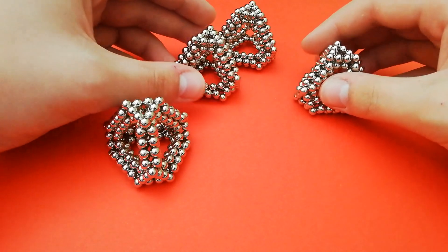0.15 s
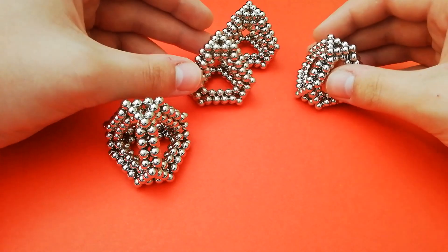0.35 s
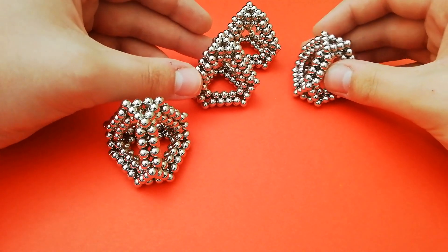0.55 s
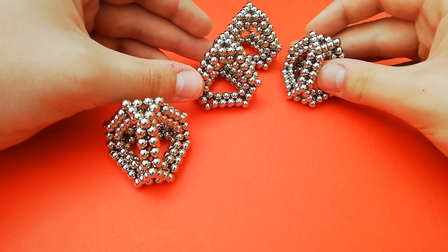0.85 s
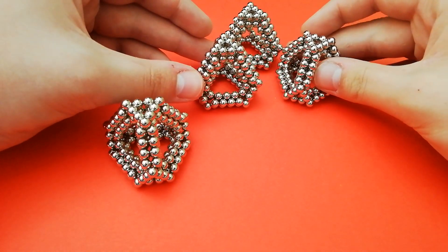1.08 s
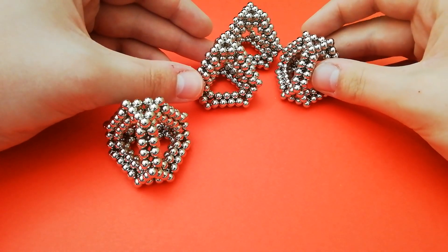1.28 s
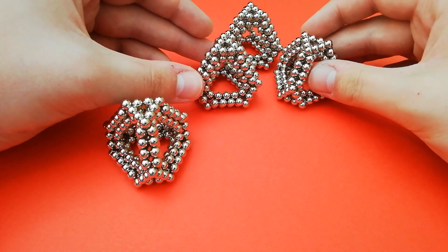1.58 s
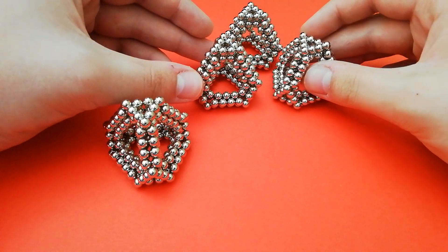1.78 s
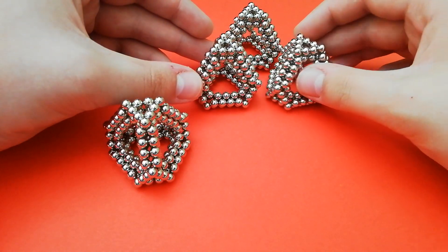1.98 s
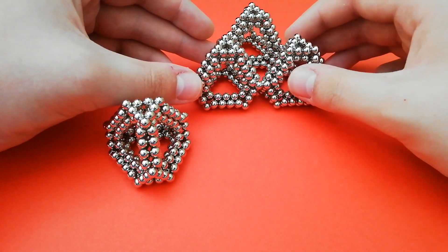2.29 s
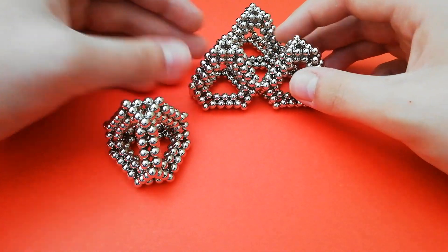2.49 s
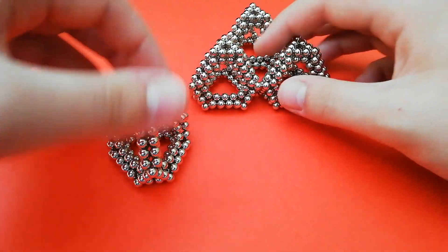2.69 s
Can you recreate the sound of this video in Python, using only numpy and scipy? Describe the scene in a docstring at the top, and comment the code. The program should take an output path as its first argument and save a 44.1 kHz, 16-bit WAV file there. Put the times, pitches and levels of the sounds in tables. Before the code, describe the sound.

Small steel magnet balls snap together on a wooden table, heard very close in a small quiet room. Soft dragging, skin rubbing and a faint squeak open it, with a flurry of tiny ticks at 0.2-0.35 s and a crisp click at 0.45. A click with a light knock comes at 1.07, the loudest rapid double snap at 2.2, then hissy rubbing from 2.45 and a soft thump at 2.83.

```python
"""Skin rubs and clusters of small steel magnet balls slide over a wooden table, hands snap the clusters together
now and then, and rubbing returns near the end, with a soft thump on the table last of all. Rubbing is noise made of
tiny grains, with a wavering scrape and a thin squeak; sliding and thump are soft noise ringing the table. Each snap
is a quick cascade of ball-on-ball ticks, and short pushes knock the table top along with the strong ones.
A spaced pair of microphones listens from close by; a small quiet room adds a short tail and a steady tone."""
import sys
import numpy as np
from scipy import signal
from scipy.fft import rfft, irfft
from scipy.io import wavfile
from scipy.ndimage import uniform_filter1d

SR = 44100
rng = np.random.default_rng(int(sys.argv[2]) if len(sys.argv) > 2 else 0)


def natural_amplitude(level_db):
    """Convert a level in decibels to a linear amplitude factor, elementwise."""
    exponent = np.asarray(level_db, float) / 20
    return 10 ** exponent


def materialize(psi):
    """Save the field psi as 16-bit PCM at rate SR to the path in sys.argv[1].

    A 1-D psi becomes a single channel; in a 2-D psi each row is a channel.
    """
    bounded = np.clip(np.atleast_2d(psi).T, -1, 1)
    quanta = np.round(bounded * 32767).astype(np.int16)
    wavfile.write(sys.argv[1], SR, quanta)


N = 125685

# steady tone of the room: (frequency [Hz], level [dB])
ROOM_TONE = [(12, -37), (22, -3), (65, -2), (176, -14.5), (308, -15.5), (455, -22.5), (653, -24),
             (993, -20), (1310, -18.5), (1600, -20), (2630, -23), (4120, -22.5), (8500, -27.5),
             (12000, -28), (15800, -34.5), (15950, -87)]
# how alike the room tone is left and right: (frequency [Hz], likeness [-1 to 1])
ROOM_ALIKE = [(60, 1), (130, 0.77), (290, 0.062), (640, -0.81), (1410, 0.4), (3100, -0.21), (6820, 0.0039),
              (15000, -0.0033)]
# time for the room's tail to die by 60 dB: (frequency [Hz], time [s])
ROOM_T60 = [(100, 0.11), (1000, 0.23), (5000, 0.22), (11000, 0.22), (16000, 0.12)]
# skin rubbing on the smooth surface, one list per stretch: (time [s], level midway between left and right [dB])
RUB_STRETCHES = [
    [(0, -61.5), (.05, -63), (.12, -71), (.2, -72), (.24, -61.5), (.3, -54.5), (.35, -72.5), (.42, -70),
     (.55, -100)],
    [(1.9, -87), (1.95, -74.5), (2.02, -77), (2.15, -80)],
    [(2.42, -97), (2.47, -66), (2.515, -57), (2.55, -60), (2.595, -53.5), (2.612, -56.5), (2.62, -74),
     (2.68, -63), (2.742, -57), (2.79, -57), (2.85, -56)],
]
# how much louder each stretch of rubbing is on the left: one value per stretch [dB]
RUB_LEFT_DB = [3.5, 6, 10]
# spectrum of the rubbing: (frequency [Hz], level [dB])
RUB_COLOUR = [(1500, -31.5), (2500, -18), (4100, -15.5), (5500, -17), (7500, -10), (9500, -5), (11200, 0),
              (12500, -6.5), (14000, -16), (15800, -22), (15950, -56)]
# top of the rubbing hiss, loudest before the finger lifts: (time [s], level midway between left and right [dB])
RUB_TOP = [(2.47, -84), (2.53, -79), (2.56, -65), (2.6, -66), (2.612, -66), (2.622, -86), (2.66, -92)]
# band of that top: lower edge [Hz], upper edge [Hz]
RUB_TOP_BAND = [12400, 15500]
# soft scrape in the middle register: (time [s], level [dB], centre frequency [Hz])
SCRAPE = [(0, -76, 1255), (.05, -66.5, 1350), (.1, -70.5, 1450), (.15, -72.5, 1272), (.24, -69, 1250),
          (.27, -88, 1500), (.3, -74, 1702), (.37, -73, 1660), (.42, -84, 1652), (.7, -76, 1650)]
# thin faint squeak: (time [s], frequency [Hz], level [dB])
SQUEAK = [(.055, 10300, -78), (.09, 10450, -69), (.11, 10450, -88), (.127, 10450, -71), (.15, 10150, -73),
          (.18, 9800, -74), (.2, 9500, -67), (.24, 9700, -72)]
# clusters dragged over the table, and a soft thump on it at the end: (time [s], level [dB])
DRAG_AND_THUMP = [(0, -59.5), (.04, -59), (.06, -59.5), (.09, -57), (.12, -65.5), (.18, -67), (.24, -67.5),
                  (.27, -59), (.3, -61.5), (.335, -55.5), (.37, -63.5), (.45, -76), (.55, -68),
                  (.65, -66.5), (.8, -72), (1.0, -69.5), (1.3, -77.5), (2.3, -78), (2.81, -85),
                  (2.835, -53.5), (2.85, -70)]
# ringing modes of the table top: (frequency [Hz], level [dB], time to die by 60 dB [s])
TABLE_MODES = [(117.6, -10, 0.28), (191.9, 2.5, 0.051), (266.7, -3, 0.052), (349.7, -9.5, 0.13),
               (438, -5.5, 0.026), (652, -7.5, 0.079), (899, -7.5, 0.14), (1193, -7.5, 0.15),
               (1287, -9.5, 0.079), (1355, -9, 0.13), (1950, -21, 0.08), (2764, -1, 0.14)]
# the dense upper modes of the board, blurred into a clatter: (frequency [Hz], level [dB per Hz])
CLATTER = [(110, -20), (250, -0.5), (400, -7), (520, -12), (780, -12.5), (1100, -9.5), (1500, -8),
           (2200, -10.5), (3500, -11)]
# knocks on the table top: (time [s], level [dB], push length [ms], clatter against the knock [dB],
# lowest mode against the knock, which depends on the spot struck [dB])
KNOCKS = [(0.448, -49, 4.5, -10, -0.5), (1.0681, -28, 0.59, -9, 5), (2.1926, -28.5, 0.73, -2.5, -11),
          (2.1988, -19.5, 0.73, -5, -3.5)]
# snaps of ball on ball: (time [s], level before a factor for length [dB], lowest pitch [Hz],
# cascade length [ms], tilt [dB per octave], highest pitch [Hz])
SNAPS = [(0.2125, -54, 7900, 5.4, 2, 15000), (0.2266, -27.5, 7500, 1.2, -0.5, 17000),
         (0.2321, -33, 9500, 1.5, 3, 17000), (.246, -31, 4030, 0.63, 5, 11000),
         (0.2481, -32.5, 5230, 3.3, 0, 16500), (0.2665, -50, 9500, 1.3, 3, 15000),
         (.2708, -45, 9000, 1.1, -1, 14500), (0.2752, -38, 8600, 2.3, -11, 14300),
         (.282, -48, 9000, 0.87, -5, 13000), (0.288, -33, 5030, 1.1, -0.5, 13500),
         (0.305, -55, 9500, 3.3, 2, 12500), (.317, -50, 7000, 1, -11, 12500),
         (0.3385, -44, 7100, 1.1, -9.5, 10000), (0.342, -47, 7040, 1.5, -12, 10500),
         (.353, -48, 7000, 1, -6, 9500), (0.4489, -20.5, 9000, 0.57, -7.5, 12500),
         (1.0689, -24.5, 1500, 1.26, -1, 17000), (2.1923, -17.5, 2010, 1.14, -1.5, 16000),
         (2.1982, -12.5, 3000, 0.88, -1.5, 17000), (2.1999, -17.5, 3000, 2, 3, 17000),
         (2.201, -16, 4040, 1.45, -2, 15500), (2.2015, -24, 7000, 2, 0, 14500)]
# what a tick rings with: (frequency [Hz], width [Hz], level [dB])
BALL_MODES = [(2240, 2840, -4), (3740, 600, -8.5), (5170, 760, -12), (7500, 1400, -6.5), (9500, 1400, -1),
              (11460, 1270, 3), (13020, 1250, 1.5), (14100, 2160, -0.5)]

ROOM_TONE_DB = -67  # what both microphones share
ROOM_DB, ROOM_FADE_IN_MS = -12.5, 1.7  # the tail and how gently it starts
TABLE_TO_ROOM_DB = -1
SCRAPE_WIDTH_HZ = 340
TABLE_LOW_HZ, TABLE_LAG_MS = 92.6, 0.41  # low cut; how much later the right microphone hears the table
CLATTER_T60_S, CLATTER_ALIKE = 0.13, 0.77  # decay; part of the power shared by left and right
TICK_SCATTER_DB, CASCADE_DB = -7.5, -23  # spread of tick levels; later ticks against the first
LEFT_LEADS_MS = 0.036
NEAR_DB, NEAR_MS = 0, 1.1  # reflections off hands and table, and how fast they fade
SPREAD_MS = 2.8  # the cluster and hands smear the snap on its way to the room
TOP_HZ = 16900


def along(table, at, col=1, log=False):
    """Read a column of a table by straight lines, over a log scale if asked."""
    rows = np.array(table, float)
    if log:
        return np.interp(np.log(at + 1e-9), np.log(rows[:, 0]), rows[:, col])
    return np.interp(at, rows[:, 0], rows[:, col])


def unit(x):
    """Scale to an rms of 1."""
    return x / np.sqrt(np.mean(x ** 2))


def coloured(x, table):
    """Shape a noise by a spectrum table."""
    gain = natural_amplitude(along(table, np.fft.rfftfreq(N, 1 / SR), log=True))
    return irfft(rfft(x) * gain, N)


def fade(table):
    """Gain over time from a level curve, silent outside it."""
    t = np.arange(N) / SR
    first, last = table[0][0], table[-1][0]
    # ramps of 30 ms, left out where the curve meets the start or end of the sound
    after_start = t - first + (first < .02)
    before_end = last - t + (last > N / SR - .03)
    return natural_amplitude(along(table, t)) * np.clip(np.minimum(after_start, before_end) / .03, 0, 1)


def walk(rate):
    """Smooth chance wandering with a spread near 1; rate is new values per second."""
    k = int(SR / rate)
    steps = np.repeat(rng.standard_normal(N // k + 1), k)
    return 1.25 * uniform_filter1d(uniform_filter1d(steps, k), k)[:N]


def ring(hz, t60, length, lag_s=0):
    """One mode: a sine that dies away evenly in dB."""
    t = np.maximum(np.arange(length) / SR - lag_s, 0)
    return np.sin(2 * np.pi * hz * t) * np.exp(-np.log(1000) * t / t60)


def room_tone():
    """Steady air and hiss; a mid and a side noise set how alike the two microphones are in each band."""
    alike = along(ROOM_ALIKE, np.fft.rfftfreq(N, 1 / SR), log=True)
    alike = np.clip(alike, -.98, .98)
    mid, side = rfft(coloured(rng.standard_normal((2, N)), ROOM_TONE))
    side = side * np.sqrt((1 - alike) / (1 + alike))
    mid, side = irfft(np.array([mid, side]), N)
    gain = natural_amplitude(ROOM_TONE_DB + .5 * walk(3.1)) / np.sqrt(np.mean(mid ** 2))
    return np.array([mid + side, mid - side]) * gain


def rubbing():
    """Dense tiny grains of friction, unrelated left and right."""
    noise = rng.standard_normal((2, N))
    bursts_db = 0.86 * rng.exponential(size=(2, N))
    wander_db = np.array([walk(150) for _ in range(2)])
    grains = noise * natural_amplitude(bursts_db + wander_db)
    halves = np.array([[.5], [-.5]])  # left up, right down
    gains = [fade(part) * natural_amplitude(db * halves) for part, db in zip(RUB_STRETCHES, RUB_LEFT_DB)]
    hiss = unit(coloured(grains, RUB_COLOUR)) * sum(gains)
    band = signal.butter(4, RUB_TOP_BAND, "band", fs=SR, output="sos")
    top = unit(signal.sosfilt(band, grains))
    below_edge = np.fft.rfftfreq(N, 1 / SR) < RUB_COLOUR[-2][0]
    top = irfft(rfft(top) * below_edge, N)
    return hiss + top * fade(RUB_TOP) * natural_amplitude(RUB_LEFT_DB[-1] * halves)


def scrape():
    """A soft wavering scrape: narrow noise around a moving centre."""
    low = signal.butter(2, SCRAPE_WIDTH_HZ / 2, fs=SR, output="sos")
    waver = signal.sosfilt(low, rng.standard_normal((2, 2, N)))
    centre_hz = along(SCRAPE, np.arange(N) / SR, col=2)
    carrier = np.exp(2j * np.pi * np.cumsum(centre_hz) / SR)
    noise = unit(np.real((waver[0] + 1j * waver[1]) * carrier))
    return noise * fade(SCRAPE) * natural_amplitude(2 * walk(23.4))


def table_modes():
    """The board's modes as (mode, microphone, time); the right microphone hears them later."""
    lags = (0, TABLE_LAG_MS / 1000)
    modes = np.array([[(-1) ** k * natural_amplitude(db) * ring(hz, t60, SR // 2, lag) for lag in lags]
                      for k, (hz, db, t60) in enumerate(TABLE_MODES)])
    high = signal.butter(4, TABLE_LOW_HZ, "high", fs=SR, output="sos")
    return signal.sosfilt(high, modes / np.abs(modes.sum(axis=0)).max())


def through(x, body):
    """Let a push or noise ring a body at both microphones."""
    return signal.fftconvolve(body, x[None])[:, :N]


def dragging_and_thump():
    """Clusters slide over the table, and a soft thump ends it: dull, uneven noise rings the board."""
    board = table_modes().sum(axis=0)
    low = signal.butter(2, 480, fs=SR, output="sos")
    soft = signal.sosfilt(low, rng.standard_normal(N) * natural_amplitude(3.1 * walk(39.9)))
    steady_rms = np.sqrt(np.mean(through(soft, board) ** 2))
    return through(soft * fade(DRAG_AND_THUMP), board) / steady_rms


def room(x):
    """A short diffuse tail, each band dying at its own rate."""
    n, tail = SR // 2, 0
    t = np.arange(n) / SR
    for hz in 90 * 2 ** np.arange(0, 7.6, .5):  # half-octave bands
        band = signal.butter(2, [hz / 1.19, hz * 1.19], "band", fs=SR, output="sos")
        decay = np.exp(-np.log(1000) * t / along(ROOM_T60, hz, log=True))
        tail = tail + signal.sosfilt(band, rng.standard_normal((2, n))) * decay
    tail = tail * np.clip(t / ROOM_FADE_IN_MS * 1000, 0, 1) ** 2
    tail = tail / np.sqrt(np.sum(tail ** 2, axis=1, keepdims=True))
    return natural_amplitude(ROOM_DB) * signal.fftconvolve(x, tail, axes=1)[:, :N]


def squeak():
    """A thin faint squeak: one sine with a gliding, slightly shaky pitch."""
    pitch_hz = along(SQUEAK, np.arange(N) / SR) + 20 * walk(68)
    return np.sin(2 * np.pi * np.cumsum(pitch_hz) / SR) * fade([(s, db) for s, _, db in SQUEAK])


def snaps(count=20):
    """A first tick and a fading cascade, reflected differently to each microphone; also what the room gets."""
    n = 2048
    out = np.zeros((4, N + n))  # left, right, then two rows for the room
    t, hz = np.arange(n) / SR, np.fft.rfftfreq(n, 1 / SR)
    # a wider mode dies sooner
    tick = sum((-1) ** k * natural_amplitude(db) * ring(mode_hz, np.log(1000) / np.pi / width, 512)
               for k, (mode_hz, width, db) in enumerate(BALL_MODES))
    octaves = np.log2((hz + SR / n) / BALL_MODES[-3][0])
    delays_ms = np.array([[0], [LEFT_LEADS_MS]])
    for s, db, low_hz, ms, tilt_db, high_hz in SNAPS:
        chance = rng.random((count, 2))
        when = np.r_[0, np.sort(chance[1:, 0]) * 3 * ms / 1000]
        tick_db = np.r_[0, TICK_SCATTER_DB * (2 * chance[1:, 1] - 1) + CASCADE_DB]
        size = natural_amplitude(tick_db) * np.exp(-when / ms * 1000)
        # spectrum of the tick times, with alternating signs
        train = np.exp(-2j * np.pi * hz[:, None] * when) @ (size * (-1) ** np.arange(count))
        near = rng.standard_normal((2, n)) * np.exp(-t / NEAR_MS * 1000) * (t > .0002)
        near = near / np.sqrt(np.sum(near ** 2, axis=1, keepdims=True))
        paths = np.exp(-2j * np.pi * hz * delays_ms / 1000) * (1 + natural_amplitude(NEAR_DB) * rfft(near))
        smear = rfft(rng.standard_normal((2, n)) * np.exp(-t / SPREAD_MS * 1000))
        spectrum = np.vstack([paths * train, smear]) * rfft(tick, n) * natural_amplitude(tilt_db * octaves)
        snap = irfft(spectrum, n)
        snap = signal.sosfilt(signal.butter(4, low_hz, "high", fs=SR, output="sos"), snap)
        snap = signal.sosfilt(signal.butter(2, high_hz, fs=SR, output="sos"), snap)
        snap /= np.sqrt(np.sum(snap ** 2, axis=1, keepdims=True))
        start = int(s * SR)
        # longer cascades carry more energy
        out[:, start:start + n] += natural_amplitude(db) * np.sqrt(ms / 1000 * SR / 4) * snap
    return out[:2, :N], out[2:, :N]


def knocks():
    """Short smooth pushes ring the board's modes and a clatter of dense upper modes."""
    t = np.arange(N) / SR
    modes = table_modes()
    n = modes.shape[2]
    shared, *own = unit(coloured(rng.standard_normal((3, N)), CLATTER))[:, :n]
    clatter = np.sqrt(CLATTER_ALIKE) * shared + np.sqrt(1 - CLATTER_ALIKE) * np.array(own)
    clatter = clatter * np.exp(-np.log(1000) * t[:n] / CLATTER_T60_S)
    push = np.zeros((3, N))  # for the upper modes, the clatter and the lowest mode
    for s, db, ms, clatter_db, lowest_db in KNOCKS:
        bump = np.sin(np.pi * np.clip((t - s) / ms * 1000, 0, 1)) ** 2
        push += natural_amplitude(np.array([[db], [db + clatter_db], [db + lowest_db]])) * bump / bump.sum()
    upper = through(push[0], modes[1:].sum(axis=0))
    return upper + through(push[1], clatter) + through(push[2], modes[0])


def scene():
    """Rubbing, table and snaps in the room, over its tone."""
    ticks, ticks_to_room = snaps()
    table = knocks() + dragging_and_thump()
    rub = rubbing() + scrape() + squeak()
    tail = room(ticks_to_room + rub + natural_amplitude(TABLE_TO_ROOM_DB) * table)
    return ticks + table + rub + tail + room_tone()


def roll_off(x):
    """The treble ends steeply here."""
    return signal.sosfilt(signal.butter(12, 17090, fs=SR, output="sos"), x)


def record(dry):
    """A steep filter cuts the very top of the treble."""
    low = signal.ellip(8, .2, 70, TOP_HZ, fs=SR, output="sos")
    mix = signal.sosfilt(low, dry)
    return roll_off(mix)


dry = scene()
out = record(dry)
materialize(out)
```